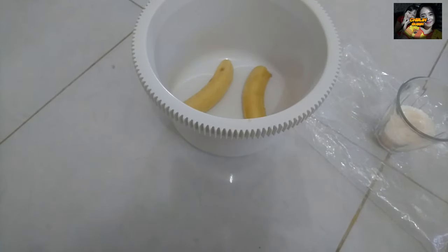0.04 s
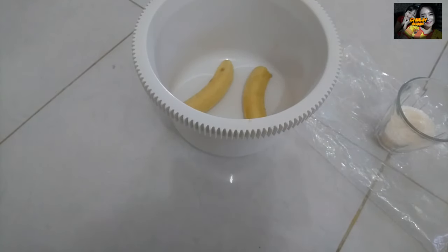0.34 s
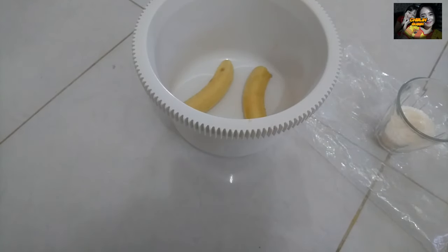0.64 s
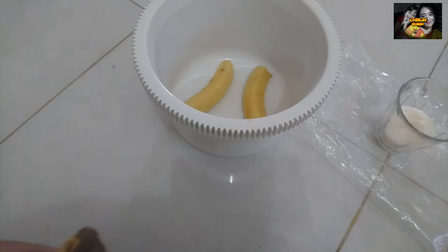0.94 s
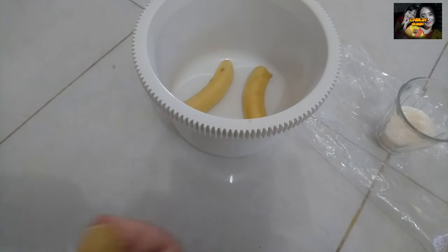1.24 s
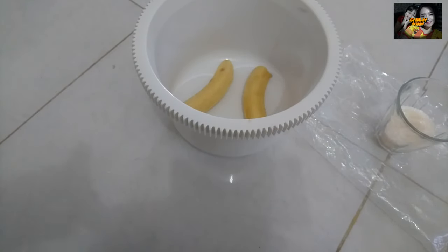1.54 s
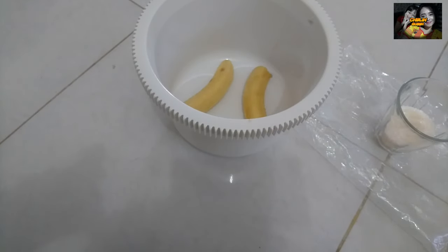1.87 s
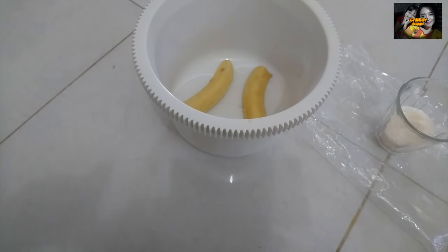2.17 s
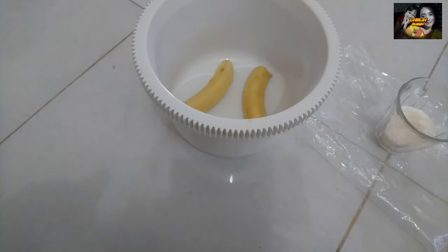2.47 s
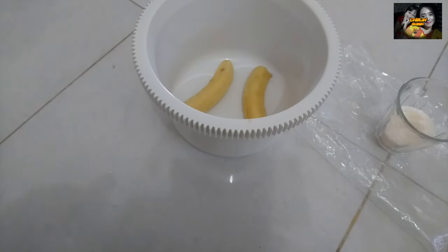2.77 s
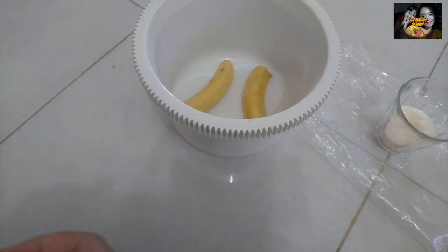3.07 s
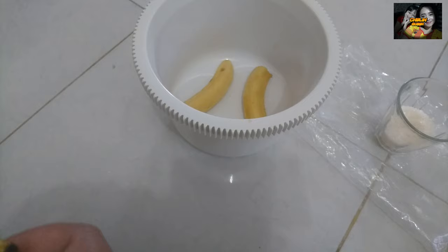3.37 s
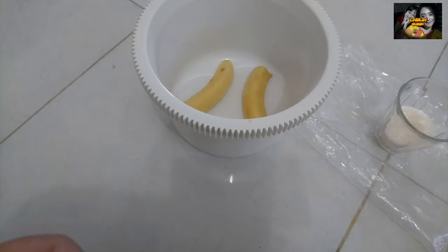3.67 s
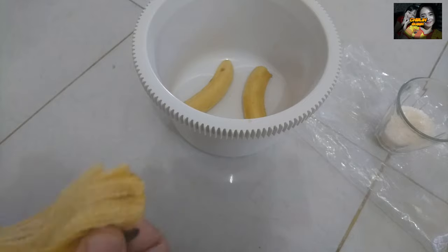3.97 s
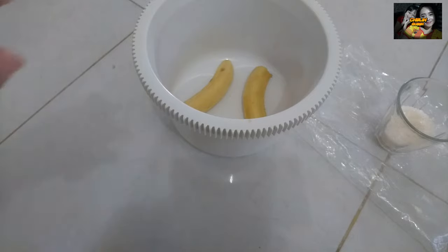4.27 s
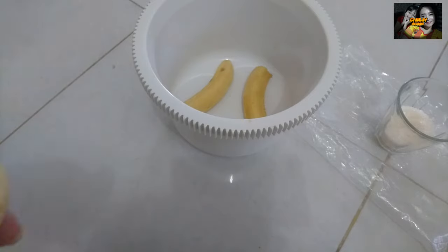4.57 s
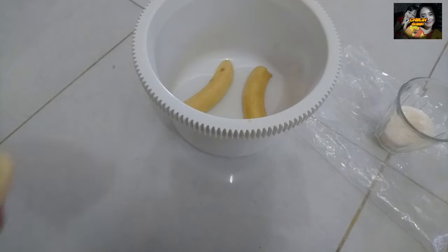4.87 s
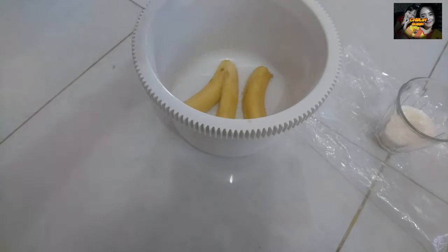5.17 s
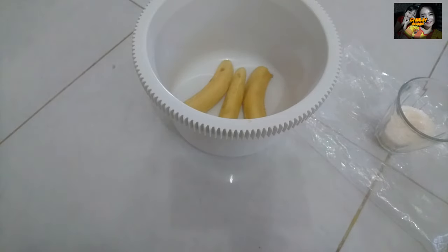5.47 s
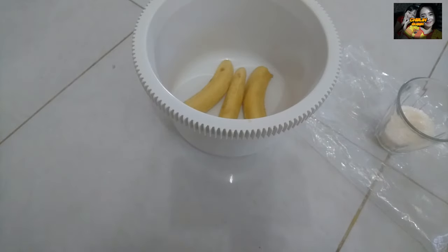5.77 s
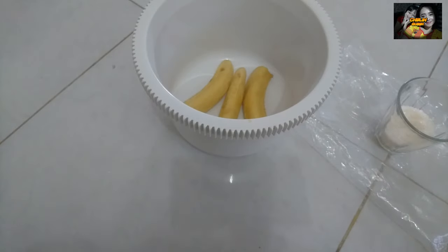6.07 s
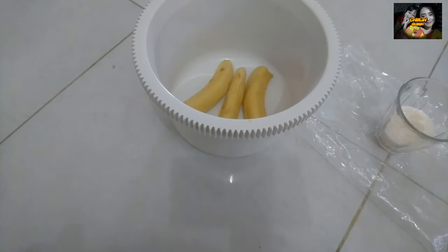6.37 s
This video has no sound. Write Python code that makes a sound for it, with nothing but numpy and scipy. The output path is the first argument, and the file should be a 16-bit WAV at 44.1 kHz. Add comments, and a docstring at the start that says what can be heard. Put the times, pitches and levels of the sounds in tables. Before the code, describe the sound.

Short two-note bird calls and soft banana peeling over a low rumble, then a sharp knock as the fruit lands in a plastic bowl.

```python
"""A small bird round a corner repeats a harsh chip and a thin whistle, echoing through a tiled room.
Close to the stereo pair, hands rustle and snap the peel off a banana, which then drops into a plastic
bowl with one sharp knock: the bowl rings briefly and the air inside it adds a hollow note.
Farther off are faint notes of other birds, over a low outdoor rumble, a hiss and a brief low tone."""
import sys
import numpy as np
from scipy import signal
from scipy.fft import rfft, irfft, next_fast_len
from scipy.io import wavfile

SR = 44100
rng = np.random.default_rng(int(sys.argv[2]) if len(sys.argv) > 2 else 0)


def waveform_to_disk(signal):
    """Save audio, clipped to [-1, 1], as 16-bit WAV at the path in sys.argv[1]."""
    frames = np.transpose(np.atleast_2d(signal))
    scaled = np.clip(frames, -1, 1) * 32767
    samples = np.round(scaled).astype(np.int16)
    wavfile.write(sys.argv[1], SR, samples)


N = 291942
TIME, BINS = np.arange(N) / SR, np.fft.rfftfreq(N, 1 / SR)

# balance of sound arriving by way of the walls: f/Hz, left minus right/dB
FAR_BALANCE = [(100, 7), (400, -2), (1400, 1.5), (2000, 0.5), (2800, 2), (3600, 7), (4400, 17), (6000, 24),
               (15000, -3)]
# balance of the hands beside the microphones: f/Hz, left minus right/dB
HAND_BALANCE = [(400, -1), (2400, 4), (3700, 7.5), (4600, 13), (6000, 2), (8000, -4), (15000, -3.5)]


def bird(direct_db=-9):
    """Chip then whistle from round a corner, heard mostly off the walls; the bird shifts between calls."""
    # t/s; chip: level/dB, top f/Hz, length/s; whistle: delay/s, length/s, level/dB, f/Hz, sag/share of f
    calls = [(1.456, -53, 4720, 0.042, .11, 0.17, -53, 2820, 0.053),
             (1.784, -49, 4510, 0.035, 0.11, 0.17, -53.5, 2768, 0.024),
             (2.155, -51, 4510, 0.042, 0.096, 0.21, -57.5, 2730, 0.036),
             (2.933, -54, 4446, 0.06, 0.093, 0.18, -55, 2728, 0.026),
             (3.278, -57, 4396, 0.048, 0.14, 0.17, -55, 2725, 0.029),
             (3.671, -55, 4480, .08, .125, 0.17, -58.5, 2680, 0.004),
             (4.066, -52.5, 4224, 0.053, 0.13, 0.14, -53.5, 2730, 0.013),
             (4.646, -54.5, 4500, 0.07, 0.15, 0.09, -52, 2720, 0.069)]
    out = np.zeros((2, N))
    for start, chip_db, top_hz, chip_s, delay_s, whistle_s, whistle_db, hz, sag in calls:
        first, second = np.zeros((2, SR))
        add(first, 0, amp(chip_db) * chip(top_hz, chip_s))
        add(second, delay_s, amp(whistle_db) * whistle(hz, whistle_s, sag))
        add(out, start, echoed(first, db=-0.5, build_s=0.0041, t60_scale=1.0))
        add(out, start, amp(direct_db) * second + echoed(second, db=-3.5, build_s=0.0038, t60_scale=0.74))
    return sided(out, FAR_BALANCE)


def chip(top_hz, length, trill_hz=78, depth=0.5, rise_s=0.00403):
    """The pitch shoots up, then dives and climbs back a few times, so fast that it rasps."""
    t = np.arange(0, length, 1 / SR)
    arch = 0.096 * (t / length - 0.572) ** 2  # droop either side of the peak
    ceiling = 1 - 0.24 * np.exp(-t / rise_s) - arch
    turns = np.cumsum(trill_hz * (1 + 0.1997 * wander(len(t), 80.2))) / SR + rng.random()
    dive = np.abs(signal.sawtooth(2 * np.pi * turns)) ** 1.8  # lingers at the top pitch
    pitch = top_hz * (ceiling * (1 - dive) + (1 - depth) * dive + 0.005 * wander(len(t), 570))
    level_db = -2.5 * t / length + 0.5 * dive
    return unit(sine(pitch) * amp(level_db) * signal.windows.tukey(len(t), 0.22))


def whistle(hz, length, sag, waver=0.014, flutter_db=3.0, settle_s=0.017):
    """A thin, fluttering note slides down onto its pitch and goes on sagging as it swells and fades."""
    progress = np.linspace(0, 1, round(length * SR))
    slide = 0.016 * np.exp(-progress * length / settle_s)
    pitch = hz * (1 + slide + sag * (0.5 - progress) + waver * wander(len(progress), 137))
    swell = np.abs(np.sin(np.pi * np.interp(progress, [0, 0.45, 1], [0, 0.5, 1]))) ** 0.47
    flutter = amp(flutter_db * wander(len(progress), 71))
    return unit(sine(pitch) * swell * flutter)


def knock(room_db=-15):
    """The soft fruit touches, then slaps the bowl against the tiles, and the room answers."""
    # two light nudges, then the banana lands: t/s, level/dB, contact half width/ms
    blows = [(0.0123, -22, 0.17), (0.0446, -30, 0.24), (5.2009, -16, 0.33), (5.207, -2.5, 0.26),
             (5.2091, 3.5, 0.029)]
    # reflections off the nearest walls: delay/s, level/dB
    walls = [(0.0142, -24.5), (0.021, -49), (0.026, -33), (.039, -33)]
    # colour of the bowl's ringing as it reaches the room: f/Hz, level/dB
    room_send = [(150, 7), (260, 7), (335, -2), (400, 2), (460, 0), (530, 0), (660, -3), (850, -4),
                 (1100, -4), (2300, -2), (2650, -2), (2770, -9.5), (2900, -4), (3100, -2), (4250, -5),
                 (5000, -15)]
    # balance of the bowl: f/Hz, left minus right/dB
    balance = [(100, 2), (400, .6), (1500, -.3), (1800, 6), (2100, 9), (2800, 7), (3600, 13), (4400, 16),
               (6000, 4), (15000, 0)]
    force = np.zeros(N)
    for start, db, contact_ms in blows:
        push = np.exp(-0.5 * ((TIME - start) * 1e3 / contact_ms) ** 2)
        force += amp(db) * push / push.sum()
    direct = bowl_shell(force)
    near = spaced(direct)
    for delay, db in walls:
        add(near, delay, amp(db) * direct)
    sent = colour(direct, read(room_send, BINS))
    tail = amp(room_db) * paired(room(sent, build_s=0.0075, t60_scale=0.74))
    return sided(near + spaced(bowl_air(force)), balance) + sided(tail, FAR_BALANCE)


def bowl_shell(force, rise_s=0.0034, low_hz=344):
    """The struck plastic rings briefly; so small a body radiates little bass."""
    # modes of the bowl standing on the tiles: f/Hz, level/dB, t60/s
    modes = [(245, -23, 0.069), (410, -3, 0.0075), (555, -24.5, 0.034), (685, -17.5, 0.022),
             (1040, -5.5, 0.0077), (1230, -23, 0.014), (1425, -28, 0.036), (1710, -24, 0.02),
             (2040, -37.5, 0.06), (2150, -14, 0.0088), (2765, -7, 0.016), (2920, -0.5, 0.0054),
             (3300, -3.5, 0.0069), (3760, -14.5, 0.017), (4400, -7, 0.0063), (4900, -19, 0.016)]
    t, ring = np.arange(SR // 5) / SR, 0
    for k, (hz, db, t60) in enumerate(modes):
        # the base moves at once, in step; the high modes of the wall take a moment to build
        sign = -1 if hz < 1600 else (-1) ** k
        build = 1 - np.exp(-t / (rise_s * (hz / 2800) ** 2))
        ring = ring + sign * amp(db) * build * decay(t, t60) * np.sin(2 * np.pi * hz * t)
    low_cut = signal.butter(2, low_hz, "high", fs=SR, output="sos")
    return signal.sosfilt(low_cut, signal.oaconvolve(force, ring)[:N])


def bowl_air(force, build_s=0.036):
    """The air in the bowl takes up the blow and rings on with a hollow note."""
    # modes of the cavity: f/Hz, level/dB, t60/s
    modes = [(388, -33, .22), (524, -28, .24), (985, -44, .22), (1104, -40, .22)]
    t = np.arange(SR // 2) / SR
    ring = sum(amp(db) * decay(t, t60) * np.sin(2 * np.pi * hz * t) for hz, db, t60 in modes)
    return signal.oaconvolve(force, ring * (1 - np.exp(-t / build_s)))[:N]


def rubs(grain_db=2.0, rise_share=0.15, wet=0.31):
    """Hands slide over peel and cloth, close up: friction grains swell quickly, hold and fade."""
    # t/s, level/dB, length/s, swell plus fade/share of length, tilt/dB per octave
    strokes = [(0.489, -62, 0.14, 0.48, -3), (0.9, -62.5, 0.33, 0.7, 1), (0.99, -57, 0.13, 0.59, -1),
               (1.465, -64.5, 1.2, 0.34, -2), (2.942, -60, 1.74, 0.19, -3), (4.347, -52.5, 0.13, 0.42, 1.5),
               (4.977, -52, 0.18, 0.7, 0), (5.172, -59, 0.59, 0.92, -1), (5.591, -53, 0.089, 0.71, 0)]
    # friction spectrum: f/Hz, level/dB
    spectrum = [(400, -1), (1000, -2.5), (2000, -5.5), (3000, -3.5), (4400, -2), (5500, -8.5), (7000, -8.5),
                (8700, -8), (10300, -17.5), (12500, -7.5), (14000, -13), (15500, -21)]
    out = np.zeros((2, N))
    for start, db, length, taper, tilt_db in strokes:
        size = next_fast_len(round(length * SR))
        t, hz = np.arange(size) / SR, np.fft.rfftfreq(size, 1 / SR)
        ramps = np.minimum(t / rise_share, (length - t) / (1 - rise_share))
        envelope = np.clip(ramps / (taper * length), 0, 1)
        grains = rng.standard_normal((2, size)) * amp(grain_db * wander(size, 300))
        shape = amp(read(spectrum, hz) + tilt_db * np.log2(np.maximum(hz, 20)))
        add(out, start, amp(db) * envelope * unit(irfft(rfft(grains) * shape, size)))
    return sided(out + wet * room(out), HAND_BALANCE)


def snaps(pan_db=2.0, rise_s=0.00027, wet=0.39):
    """Brief sticky cracks of peeling, and of the fruit landing in the bowl, close by on the left."""
    # t/s, level/dB, decay/s, tilt/dB per octave
    cracks = [(1.79, -51, 0.0032, 4), (1.872, -38.5, 0.0014, 1), (2.048, -54, 0.0089, -6),
              (2.75, -60.5, 0.021, 3), (3.077, -61, .0044, 8), (3.936, -49, 0.0037, -2),
              (5.211, -47.5, 0.0064, 8), (5.22, -40, 0.0093, -6), (5.322, -53, .0037, 8),
              (5.6054, -44.5, 0.0054, -3), (5.616, -45, 0.0032, -15), (5.6291, -38.5, 0.0031, -0.5),
              (5.6318, -37.5, 0.0019, 3.5)]
    # spectrum of a crack: f/Hz, level/dB
    spectrum = [(300, -25), (1200, -8), (3000, -2), (3900, -5), (4600, 1), (5300, -9), (6100, -7),
                (8500, -12.5), (10500, -21.5), (13000, -18), (15500, -32)]
    out = np.zeros((2, N))
    t = np.arange(SR // 10) / SR
    hz = np.fft.rfftfreq(len(t), 1 / SR)
    for start, db, decay_s, tilt_db in cracks:
        envelope = amp(db) * (1 - np.exp(-t / rise_s)) * np.exp(-t / decay_s)
        crack = envelope * rng.standard_normal((2, len(t)))
        shape = unit(amp(read(spectrum, hz) + tilt_db * np.log2(np.maximum(hz, spectrum[0][0]))))
        kernel = np.fft.fftshift(irfft(shape, len(t)))
        add(out, start - t[-1] / 2, signal.fftconvolve(crack, kernel[None]))  # early by the filter's delay
    return sided(out + wet * room(out), HAND_BALANCE) * amp([[pan_db], [-pan_db]])


def far_birds():
    """Soft notes from birds farther off, all echo."""
    # t/s, level/dB, f/Hz, length/s
    notes = [(0.051, -65.5, 765, 0.17), (2.621, -65, 768, 0.13), (3.01, -69.5, 830, 0.18),
             (3.345, -70, 3390, 0.11), (3.5, -71, 3390, 0.11), (3.718, -67, 3360, 0.09),
             (4.94, -68.5, 837, 0.14), (5.621, -64.5, 770, 0.12)]
    out = np.zeros(N)
    for start, db, hz, length in notes:
        add(out, start, amp(db) * whistle(hz, length, sag=0.022, waver=0.012, flutter_db=7.5))
    return room(out, build_s=0.0017, t60_scale=0.77)


def background(bed_db=-48, calm_db=-1.2):
    """A brief low bump from a nudge at the start, then three slow swells of outdoor rumble, under hiss."""
    # noise spectrum: f/Hz, relative density/dB
    spectrum = [(15, -51), (25, -22), (53, -5.5), (129, -3.5), (215, -2), (297, -8), (322, -11.5),
                (537, -22), (762, -22), (970, -26.5), (1710, -32), (2420, -35.5), (3800, -40.5),
                (4700, -38.5), (5580, -41), (10500, -46.5), (12500, -47.5), (15500, -51.5)]
    # the part of the noise that rises and falls: f/Hz, level/dB
    moving_part = [(50, -43), (130, -4.5), (900, -20.0), (3000, -11)]
    # the nudge's bump, then three swells of rumble: crest t/s, level over the calm/dB, half width/s
    crests = [(.02, 17.5, 0.035), (.85, 5, 0.4), (3.13, 6.5, 0.41), (5.0, 7.5, 0.36)]
    # balance of the noise: f/Hz, left minus right/dB
    balance = [(60, 1.5), (400, 0.5), (1300, -0.5), (2400, 0.5), (4400, 6), (7000, 1.5), (15000, 0.5)]
    bed = amp(bed_db) * unit(colour(paired(rng.standard_normal((2, N))), read(spectrum, BINS)))
    moving = colour(bed, read(moving_part, BINS))
    return sided(bed + moving * (amp(calm_db + swells(crests)) - 1), balance)


def drone(hz=174, waver=0.034, flutter_db=3.0):
    """A wavering low tone swells twice out of the rumble and sinks back."""
    # crest t/s, level/dB, half width/s
    crests = [(.76, -47.5, 0.25), (1.01, -44, 0.12)]
    tone = sine(hz * (1 + waver * wander(N, 28))) * amp(-flutter_db * wander(N, 32))
    return unit(tone) * swells([(crest, amp(db), width) for crest, db, width in crests])


def room(x, build_s=0.0031, t60_scale=1.0):
    """Diffuse tail of the tiled room, different at each microphone; every band dies at its own speed."""
    # reverberation time: f/Hz, t60/s
    reverb_times = [(100, 0.41), (500, 0.96), (1200, 0.99), (2800, 0.78), (4500, 0.55), (8000, 0.6),
                    (15000, 0.11)]
    taps = rng.choice([-1., 1.], (2, SR)) * (rng.random((2, SR)) < 1 / 8)
    hz, t, bands = signal.stft(taps, SR, nperseg=256)
    t60 = t60_scale * read(reverb_times, hz)[:, None]
    tail = signal.istft(bands * decay(t, t60), SR, nperseg=256)[1]
    tail *= 1 - np.exp(-(np.arange(tail.shape[1]) / SR / build_s) ** 2)
    return signal.fftconvolve(np.atleast_2d(x), tail / np.linalg.norm(tail[0]), axes=1)[:, :x.shape[-1]]


def echoed(x, db, build_s, t60_scale):
    """The room's answer to a note, carrying a set share of its energy."""
    wet = room(x, build_s, t60_scale)
    return amp(db) * wet * np.linalg.norm(x) / np.linalg.norm(wet, axis=1, keepdims=True)


def paired(x):
    """Long waves reach both microphones alike."""
    # f/Hz, left-right coherence/ratio
    coherence = [(30, 0.91), (130, 0.94), (290, 0.92), (640, 0.36), (1400, 0), (15000, 0.02)]
    same = np.clip(read(coherence, BINS), -1, 1)
    left, right = rfft(x)
    return irfft(np.array([left, same * left + np.sqrt(1 - same ** 2) * right]), N)


def spaced(x, lag_ms=0.11):
    """The sound reaches the right microphone just after the left."""
    return np.array([x, np.interp(TIME - lag_ms / 1000, TIME, x)])


def sided(x, balance):
    """Shares each frequency between the two microphones."""
    return colour(x, read(balance, BINS) * np.array([[0.5], [-0.5]]))


def colour(x, db):
    """Filters by a dB curve over BINS."""
    return irfft(rfft(x) * amp(db), N)


def read(points, hz):
    """Reads a curve on a log-frequency axis."""
    f, value = np.transpose(points)
    return np.interp(np.log(hz + 1), np.log(f + 1), value)


def wander(size, hz):
    """Random motion of rms 1, mostly slower than hz."""
    f = np.fft.rfftfreq(size, 1 / SR)
    return unit(irfft(rfft(rng.standard_normal(size)) / (1 + (f / hz) ** 4), size))


def swells(rows):
    """Bell-shaped rises from rows of crest t/s, height, half width/s."""
    return sum(height * np.exp(-((TIME - crest) / width) ** 2) for crest, height, width in rows)


def sine(hz):
    """A tone that follows a pitch curve."""
    return np.sin(2 * np.pi * np.cumsum(hz) / SR)


def decay(t, t60):
    """Falls by 60 dB in t60 seconds."""
    return np.exp(-np.log(1000) * t / t60)


def amp(db):
    """Decibels to gain."""
    return 10 ** (np.asarray(db) / 20)


def unit(x):
    """Scales to rms 1."""
    return x / np.sqrt(np.mean(x ** 2) + 1e-20)


def add(mix, start_s, sound):
    """Mixes a sound in at start_s."""
    part = mix[..., max(round(start_s * SR), 0):][..., :sound.shape[-1]]
    part += sound[..., :part.shape[-1]]


def scene():
    """All sources at the stereo pair in the tiled room."""
    return bird() + far_birds() + knock() + rubs() + snaps() + background() + drone()


def record(dry):
    """The recorder's band limit."""
    low_pass = signal.firwin(601, cutoff=15550, window=("kaiser", 9), fs=SR)
    return signal.oaconvolve(dry, low_pass[None], "same")


dry = scene()
out = record(dry)
waveform_to_disk(out)
```